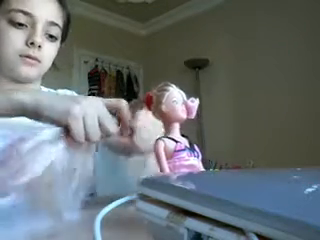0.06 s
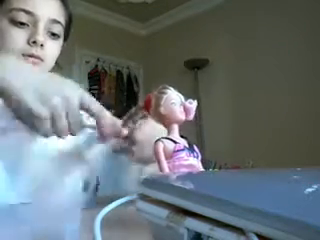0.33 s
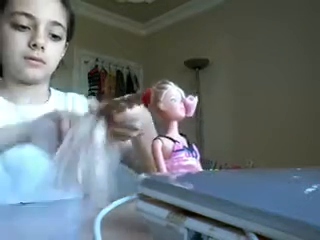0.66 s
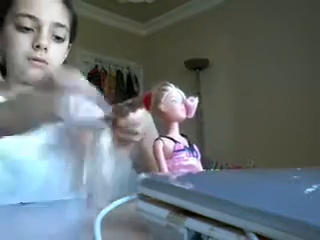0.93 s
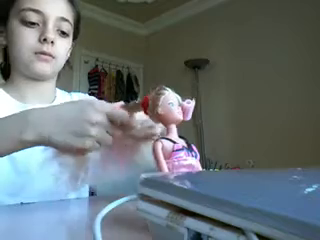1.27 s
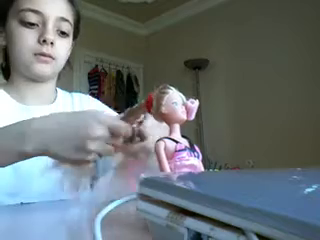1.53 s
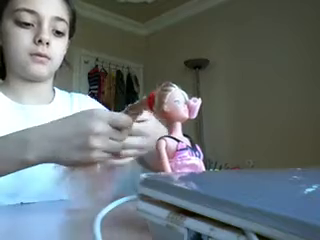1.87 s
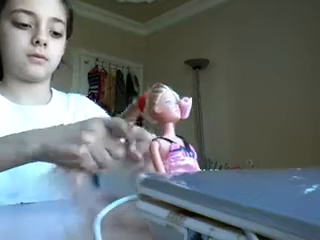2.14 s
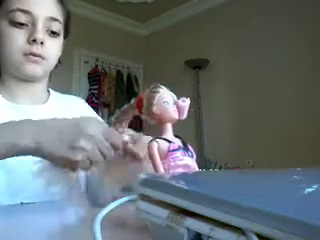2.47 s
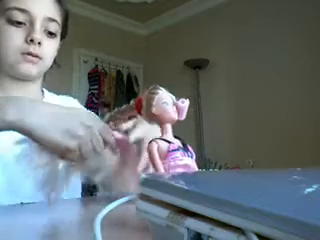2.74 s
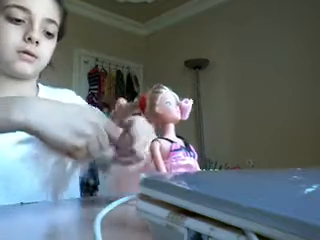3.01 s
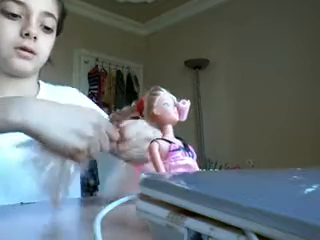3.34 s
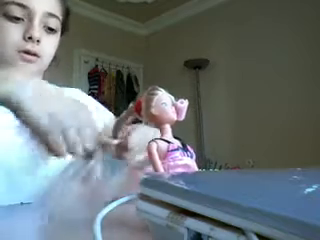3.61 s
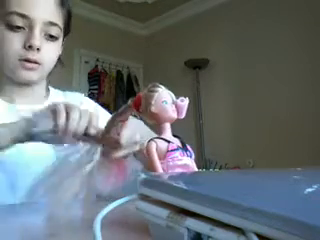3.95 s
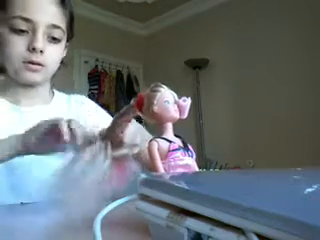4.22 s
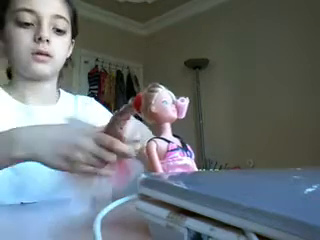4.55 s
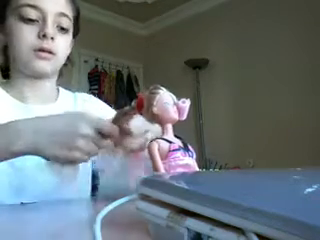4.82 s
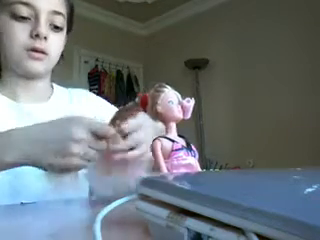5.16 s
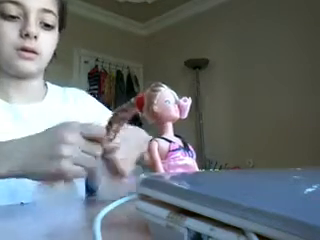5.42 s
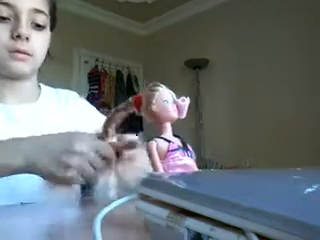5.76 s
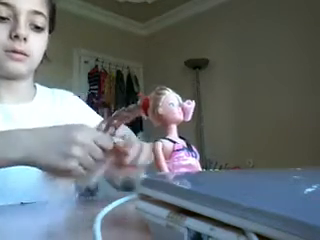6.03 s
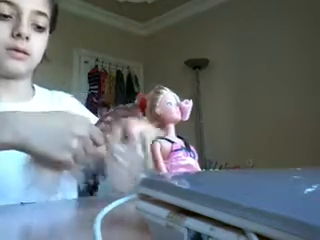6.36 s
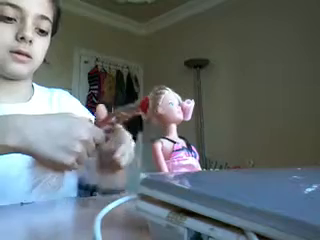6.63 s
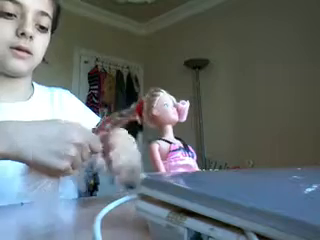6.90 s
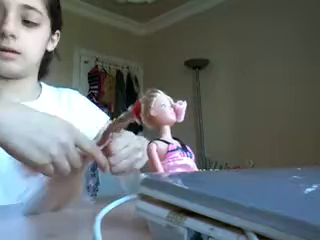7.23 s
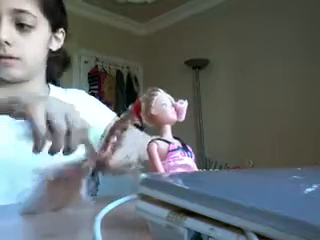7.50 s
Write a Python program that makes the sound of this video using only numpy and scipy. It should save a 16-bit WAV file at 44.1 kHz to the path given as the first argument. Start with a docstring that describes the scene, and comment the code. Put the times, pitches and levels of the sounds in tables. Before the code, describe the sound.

Hands braid a doll's hair at a table, close to a computer microphone in a small, quiet room. Hair swishes faintly through the fingers while forearms scuff and bump the table top and a plastic casing ticks. Hard plastic clacks down right at the start, followed by a thump. Softer knocks and a snap of caught strands come in the middle, and a much louder plastic clack lands after about six seconds.

```python
"""Hands braid a doll's hair at a table, close to a computer's microphone in a small, quiet room.
With each stroke hair swishes through the fingers and the forearms rub and bump the table top; twice hard plastic clacks down on it.
A plastic casing next to the microphone ticks as the table is leaned on."""
import sys
import numpy as np
from scipy import signal
from scipy.fft import rfft, irfft, next_fast_len
from scipy.io import wavfile
from scipy.ndimage import uniform_filter1d, minimum_filter1d, map_coordinates

SR = 44100
rng = np.random.default_rng(int(sys.argv[2]) if len(sys.argv) > 2 else 0)


def bounce(signal):
    """Save signal as a 16-bit WAV file at the path given by the first command-line argument."""
    frames = np.transpose(np.atleast_2d(signal))
    limited = np.clip(frames, -1, 1)
    pcm = np.round(limited * 32767).astype(np.int16)
    wavfile.write(sys.argv[1], SR, pcm)


N = 334278

# hands and forearms knock the table: (s, level dB, weight dB of the bass, hardness dB of the treble)
KNOCKS = [(0.3032, -52.5, -1, -5), (0.522, -29.5, 2, -10.5), (1.432, -55, 4.5, -24), (1.638, -52, 6, -11), (1.693, -66, -10, 7),
          (2.931, -41, 3, -9), (2.962, -38, 6.5, -7.5), (3.101, -44, -1, -24.5), (3.239, -59, -14, -12), (4.272, -48, 1, -8.5),
          (4.635, -47, 8, -6), (4.7625, -43, -3, -7), (6.471, -34.5, -7.5, -21), (7.05, -52.5, -11, -19), (7.277, -48.5, -2, -14.5)]
# ticks of the casing: (s, level dB, sharpness dB)
TICKS = [(0.073, -38.5, -0.5), (0.36, -35.5, -3), (0.734, -37, -8.5), (0.885, -47.5, -45), (1.306, -36, 1.5), (1.494, -49, -42),
         (2.081, -55.5, -31), (2.246, -39.5, -4), (2.287, -39, -11.5), (2.31, -48, -22), (5.154, -46, -34),
         (6.085, -48.5, -4), (6.104, -27.5, 6.5), (7.179, -55, -6)]
# hand strokes: (start s, length s, sleeve scuff dB, hair dB, table rumble dB (these two relative to the scuff))
STROKES = [(0.02, 0.3, -85.5, 10, 8), (0.31, 0.33, -74.5, 13.5, -6), (1.535, 0.047, -69, 8, -2), (1.608, 0.18, -58, -0.5, -1.5),
           (1.85, 0.096, -67.5, -3.5, 2.5), (2.28, 0.18, -69, -1.5, 1), (2.6, 0.18, -80.5, 10, 4), (2.736, 0.036, -77.5, 13.5, -3),
           (2.84, 0.24, -62.5, -0.5, -3), (3.16, .1, -78.5, 8, 10), (3.3, 0.15, -72.5, -3, -3), (3.95, 0.086, -71, -19, 4.5),
           (4.179, 0.17, -57, 5, -0.5), (4.498, 0.073, -65, -0.5, -3), (4.585, 0.12, -62, -6.5, 3.5), (5.305, 0.13, -69.5, 4.5, 8.5),
           (5.38, .29, -67.5, -6, -1), (5.813, 0.17, -53.5, -10.5, -5), (6.149, 0.13, -57.5, -7.5, -8), (7.07, 0.18, -73, -1, 8.5),
           (7.24, 0.21, -71, -1.5, 0.5)]
# resonances of the table top and what lies on it: (Hz, width Hz, dB above the rest)
TABLE = [(134, 22, 9), (194, 20, 3), (233, 14, 8), (400, 45, 8), (440, 30, 6), (560, 60, 2), (1250, 90, 2), (1880, 130, 4), (3350, 250, 3), (5000, 450, 3)]  # fixed
# resonances of the casing: (Hz, width Hz, dB)
CASING = [(500, 90, -4), (900, 130, -7), (1100, 130, -4), (1340, 170, -8), (1820, 180, -6), (2080, 200, -7), (2300, 140, -9), (2660, 170, -3), (3000, 220, -7), (3500, 280, -12), (4140, 300, -4), (4410, 220, -7), (4900, 200, -6), (5350, 260, 3), (5720, 300, -2), (6420, 320, -5), (6800, 220, -9), (7250, 350, -15), (8400, 500, -24)]  # fixed
# spectra: (Hz, dB per Hz)
BLOW = [(25, -17.5), (48, -16), (72, -14), (130, 0.5), (320, -3.5), (600, 0), (1000, -2), (2000, -4.5), (3500, -5.5), (6200, -3), (7200, -19.5), (8600, -25), (12000, -46), (15000, -82)]
RUB = [(120, -19.5), (280, -10.5), (420, 0.5), (600, 0.5), (800, -10), (1300, -14.5), (2500, -18.5), (5000, -35), (12000, -47)]  # scuffing: (Hz, dB per Hz)
HAIR = [(300, -24.5), (900, -6), (2000, -15), (3200, -10), (4500, -3.5), (5800, 0.5), (6700, -6.5), (8000, -11), (10000, -14), (14500, -28.5)]
HISS = [(24, -21), (42, 3), (62, -5), (96, -1), (176, -7.5), (239, -5), (300, -9.5), (660, -10), (850, -14.5), (1250, -16.5), (3600, -18), (5800, -15), (8000, -17.5), (14500, -19)]
ROOM = [(80, 0.55), (200, 0.66), (500, 0.34), (1200, 0.35), (5000, 0.28), (12000, 0.25)]  # (Hz, t60 s)
TOP_HZ = 14650  # fixed
PANEL = [(100, 0.031), (400, 0.28), (900, 0.045), (2000, 0.1), (6000, 0.04)]  # ring of flat panels: (Hz, t60 s)
# hard plastic comes down on the table: (s, level dB, snap dB of the top, room dB, ring of the hollow plastic dB)
CLACKS = [(0.3968, -26, 0.5, -5.5, -43), (6.3076, -16.5, 9, 2.5, -26.5)]
# modes of the hollow plastic: (Hz, dB, t60 s)
PLASTIC = [(234, 2, .36), (274, 5, .28), (353, -2, .22), (738, -4, .2), (1605, -11, .26), (1868, -4, .2), (1899, -5, .2), (2406, -7, .18), (2660, -2, .2), (2882, 4, .12), (4063, -5, .2), (4622, -4, .2), (4836, 0, .17), (5001, 3, .2), (6108, -3, .2)]  # fixed
# strands snag and snap free: (s, level dB)
SNAGS = [(0.3031, -45.5), (4.215, -50.5), (4.241, -43), (4.65, -44.5), (4.7638, -31.5)]
SNAP = [(500, -21.5), (2600, -35), (3350, 0), (3700, -5), (4200, -5), (4800, 1), (5700, -5.5), (6600, -16.5), (8000, -29), (13000, -43)]  # a snapping strand: (Hz, dB per Hz)
RUMBLE = [(30, -26), (70, -18.5), (130, -2.5), (220, -1.5), (300, -12.5), (500, -32.5), (2000, -58)]  # arms on the table: (Hz, dB per Hz)
CLACK_SLOPE, SNAP_SLOPE, SNAP_DB = 0.82, 0.9, -4.5  # upper mids and top follow hardness (dB per dB); the top's offset
ROOM_SLOPE, KNOCK_ROOM_DB = 0.75, 1.05  # harder knocks carry further into the room (dB per dB); the room's offset
CLACK_COLOUR = [(90, 0), (135, -6.5), (230, -3.5), (400, -2.5), (750, -1), (1500, -0.5), (2600, 6.5)]  # (Hz, dB)
RISE_SHARE, FALL_SHARE = 0.26, 0.64  # parts of a stroke in which the hand speeds up and slows down
ARM_LAG_S, TABLE_LAG_S = .012, 0.013  # the fingers move first, the sleeve follows, then the table judders
SCRATCH_DB, SCRATCH_RATE, SCRATCH_SPREAD_DB = -4, 200, 3  # single strands flick past the fingers: level, per second, size spread


def amp(db):
    """Decibels to gain."""
    return 10 ** (np.asarray(db) / 20)


def unit(x):
    """Scale to rms 1."""
    return x / np.sqrt(np.mean(x ** 2) + 1e-20)


def along(points, hz):
    """(Hz, value) points read on a log axis."""
    f, v = np.transpose(points)
    return np.interp(np.log(hz + 1), np.log(f + 1), v)


def add(track, s, sound):
    """Mix a sound into a track at time s."""
    part = track[round(s * SR):][:len(sound)]
    part += sound[:len(part)]


def wobble(rate, size=N):
    """A smooth random curve, rate knots a second."""
    return map_coordinates(rng.standard_normal(int(size * rate / SR) + 4), [np.arange(size) * rate / SR])


def coloured(x, gain):
    """x through the causal (minimum-phase) filter with this gain over frequency."""
    m = 2 * next_fast_len(len(x) // 2 + 4096)  # fixed
    cepstrum = irfft(np.log(np.maximum(gain(np.fft.rfftfreq(m, 1 / SR)), 1e-6)))
    cepstrum[1:m // 2] *= 2
    cepstrum[m // 2 + 1:] = 0
    return irfft(rfft(x, m) * np.exp(rfft(cepstrum)), m)[:len(x)]


def table(hz):
    """Gain of the table top's resonances."""
    return amp(sum(db / (1 + (2 * (hz - centre) / width) ** 2) for centre, width, db in TABLE))


def tail(decay, build):
    """A fresh diffuse ring of energy 1: echoes thicken over the build time, each frequency dies at its own speed."""
    hz, t, z = signal.stft(rng.standard_normal(SR), SR, nperseg=256)
    x = signal.istft(z * amp(-60 * t / along(decay, hz)[:, None]), SR, nperseg=256)[1][:SR]
    x = x * (1 - np.exp(-np.arange(SR) / SR / build))
    return x / np.linalg.norm(x)


def contact(length):
    """A short, dense burst with an even spectrum and energy 1."""
    fade = np.exp(-(np.arange(SR // 8) / SR / length) ** 2)
    x = rng.standard_normal(len(fade)) * fade
    for _ in range(4):
        x = irfft(np.exp(1j * np.angle(rfft(x))), len(x)) * np.sqrt(fade)
    return np.pad(x / np.linalg.norm(x), (0, SR - len(x)))


def grains(rate, spread_db):
    """Countless tiny slips of uneven size in a smooth bed of friction noise."""
    slips = rng.random(N) < rate / SR
    return unit(slips * rng.standard_normal(N) * amp(spread_db * rng.standard_normal(N))) + rng.standard_normal(N)


def knocks():
    """A heavier knock thuds more; a harder one is brighter and stirs the room more."""
    out = np.zeros(N)
    for s, db, weight_db, hard_db in KNOCKS:
        colour = [(230, weight_db), (350, 0), (750, 0.0056), (1500, CLACK_SLOPE * hard_db), (2200, CLACK_SLOPE * hard_db),
                  (4000, SNAP_DB + SNAP_SLOPE * hard_db)]
        add(out, s, amp(db) * blow(colour, KNOCK_ROOM_DB + ROOM_SLOPE * hard_db))
    return out


def ticks(travel=.0016, bend_hz=1000):
    """The same spot of the casing slips each time; its bending waves carry treble sooner than bass."""
    out = np.zeros(N)
    hz = np.fft.rfftfreq(SR // 4, 1 / SR)
    shell = sum((-1) ** k * amp(db) * 1j * hz * w / (c * c - hz * hz + 1j * hz * w) for k, (c, w, db) in enumerate(CASING))
    shell = irfft(shell * np.exp(-4j * np.pi * travel * np.sqrt(hz * bend_hz)))
    shell = np.pad(shell / np.linalg.norm(shell), (0, SR - len(shell)))
    for s, db, sharp_db in TICKS:
        # the panels around it add a brief woody body, the room a faint halo
        body = coloured(tail(PANEL, build=0.00091), lambda f: amp(along([(150, -10.0), (400, -0.5), (1000, 6.0), (2000, -1.5), (6000, -3), (8000, -1), (12000, -34)], f)))
        halo = coloured(tail(ROOM, build=.006), lambda f: amp(along([(150, -22.5), (500, -9), (6000, -11.0), (8000, -31.5), (12000, -45)], f)))
        edge = [(150, -2), (450, -8), (1000, -5.5), (2500, .12 * sharp_db - 4.5), (4800, sharp_db - 4), (7200, sharp_db - 7.5), (9500, sharp_db - 12), (14000, sharp_db - 29.5)]
        add(out, s, coloured(shell + body + halo, lambda f: amp(db + 23.5 + along(edge, f))))
    return out


def strokes(wet_db=-7):
    """Arms judder and scuff over the table top while strands of hair slip and scratch past each other."""
    weight, sleeve, hair = np.zeros((3, N))
    for s, length, db, hair_db, rumble_db in STROKES:
        speed = amp(db) * hand_speed(length)
        add(hair, s, amp(hair_db) * speed)
        add(sleeve, s + ARM_LAG_S, speed)
        add(weight, s + TABLE_LAG_S, amp(rumble_db) * speed)
    rumble = unit(coloured(grains(rate=230, spread_db=3.5), lambda hz: np.sqrt(table(hz)) * amp(along(RUMBLE, hz))))
    scuff = unit(coloured(grains(rate=1000, spread_db=-0.5), lambda hz: np.sqrt(table(hz)) * amp(along(RUB, hz))))
    flicks = (rng.random(N) < SCRATCH_RATE / SR) * amp(SCRATCH_SPREAD_DB * rng.standard_normal(N))
    strands = unit(grains(rate=1900, spread_db=4.5)) + amp(SCRATCH_DB) * unit(flicks)
    swish = unit(coloured(strands, lambda hz: amp(along(HAIR, hz))))
    catch = amp(1.9 * wobble(55))  # the fingers catch and let go
    near = catch * (amp(-1.5) * weight * rumble + amp(-2.76) * sleeve * scuff + amp(-1) * hair * swish)
    return near + amp(wet_db) * signal.fftconvolve(near, tail(ROOM, build=0.00068))[:N]


def groan(pitch_hz=231, db=-48, fall_db=3):
    """A dragging arm briefly keeps one resonance of the table sounding."""
    t = np.arange(N) / SR
    hold = np.interp(t, [4.64, 4.66, 4.755, 4.80], [0, 1, amp(-fall_db), 0])
    return amp(db) * hold * np.sin(2 * np.pi * pitch_hz * t + .11 * wobble(46))


def background(sound, swell_db=6, knee_db=-54):
    """Faint room rumble and microphone hiss; the hiss swells a little around louder sounds."""
    power = np.abs(uniform_filter1d(sound ** 2, size=4000))
    swell = amp(swell_db * power / (power + amp(knee_db) ** 2))
    return amp(-69.0) * swell * unit(coloured(rng.standard_normal(N), lambda hz: amp(along(HISS, hz))))


def plastic(attack=0.014):
    """Hollow plastic strikes the table and rings briefly, with slightly different strengths at each blow."""
    out, t = np.zeros(N), np.arange(SR // 2) / SR
    for s, db, snap_db, room_db, ring_db in CLACKS:
        add(out, s, amp(db) * blow(CLACK_COLOUR + [(4000, snap_db)], room_db))
        for hz, level, t60 in PLASTIC:
            fade = amp(ring_db + level + rng.normal(0, 2.4) - 60 * t / t60) * (1 - np.exp(-t / attack))
            add(out, s, fade * np.sin(2 * np.pi * hz * t + 0.09 * wobble(47, size=len(t))))
    return out


def skid(db=-48):
    """Plastic skids with a thin squeak just before it comes down hard."""
    push = np.interp(np.arange(N) / SR, [6.24, 6.268, 6.29, 6.306], [0.0052, 0.98, 1.0, 0.019])
    colour = [(80, -18), (280, -6), (440, 8), (700, -4), (1100, -13), (3100, -10), (3420, 5), (3750, -8), (5500, -3), (7500, -15), (13000, -26)]  # fixed
    return amp(db) * push * unit(coloured(grains(rate=12000, spread_db=-1.5), lambda hz: amp(along(colour, hz))))


def snags(wet_db=-9, scrape_db=-9, scrape=.025):
    """A caught strand lets go with one bright, narrow snap and a short scrape."""
    out = np.zeros(N)
    for s, db in SNAGS:
        slip = contact(length=0.0028) + amp(scrape_db) * contact(length=scrape) + amp(wet_db) * tail(ROOM, build=0.0048)
        add(out, s, amp(db + 32) * coloured(slip, lambda hz: amp(along(SNAP, hz))))
    return out


def blow(colour, room_db):
    """One blow on the table: the contact, the ring of its panels and the room's answer."""
    x = amp(-2.0) * contact(length=0.0054) + amp(-4) * tail(PANEL, build=0.0018) + amp(room_db) * tail(ROOM, build=0.02)
    return amp(32.5) * coloured(x, lambda hz: table(hz) * amp(along(BLOW, hz) + along(colour, hz)))


def hand_speed(length):
    """A stroke speeds up, holds and eases off."""
    u = np.arange(round(length * SR)) / (length * SR)
    return np.sin(np.pi / 2 * np.clip(np.minimum(u / RISE_SHARE, (1 - u) / FALL_SHARE), 0, 1)) ** 1.0


def scene():
    """Everything reaches one microphone."""
    sound = knocks() + plastic() + ticks() + snags() + strokes() + skid() + groan()
    return (sound + background(sound))[None]


def record(dry):
    """A fast limiter holds peaks under full scale; nothing is kept above the band limit."""
    needed = np.minimum(1, .93 / (np.abs(dry) + 1e-9))  # fixed
    gain = uniform_filter1d(minimum_filter1d(needed, size=89), size=89)
    m = next_fast_len(N + SR // 2)
    cut = np.clip((TOP_HZ - np.fft.rfftfreq(m, 1 / SR)) / 300 + .5, 0, 1)  # fixed
    return irfft(rfft(dry * gain, m) * cut, m)[..., :N]


dry = scene()
out = record(dry)
bounce(out)
```